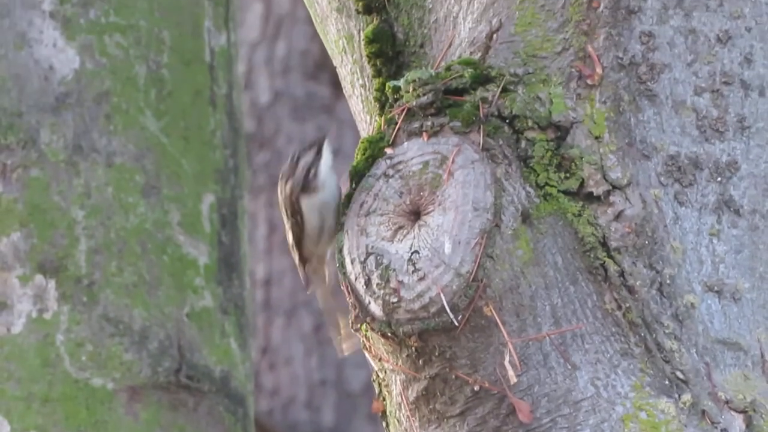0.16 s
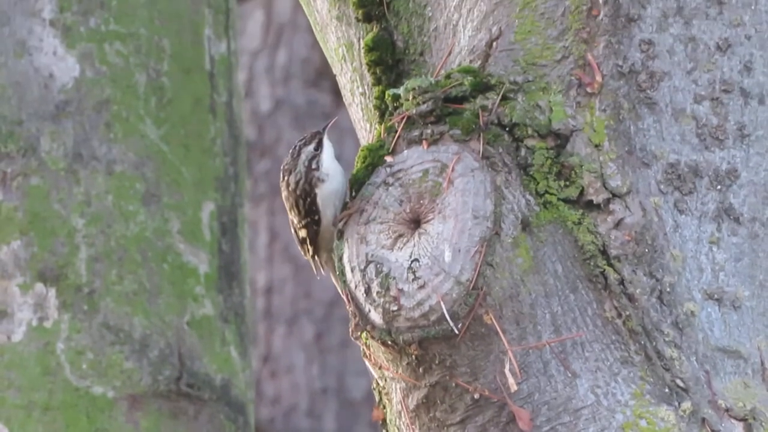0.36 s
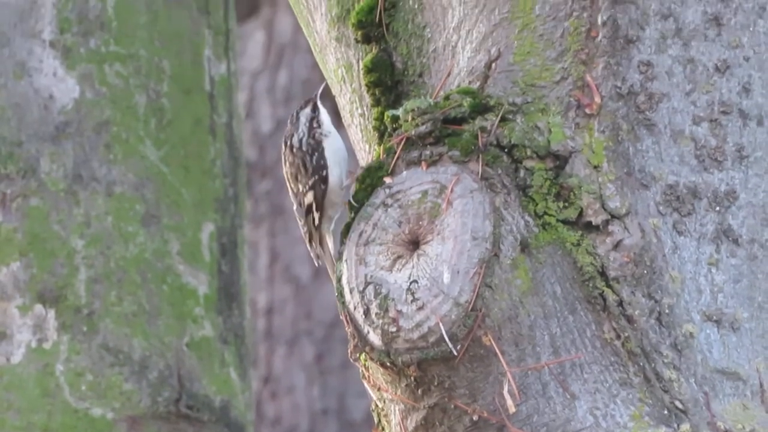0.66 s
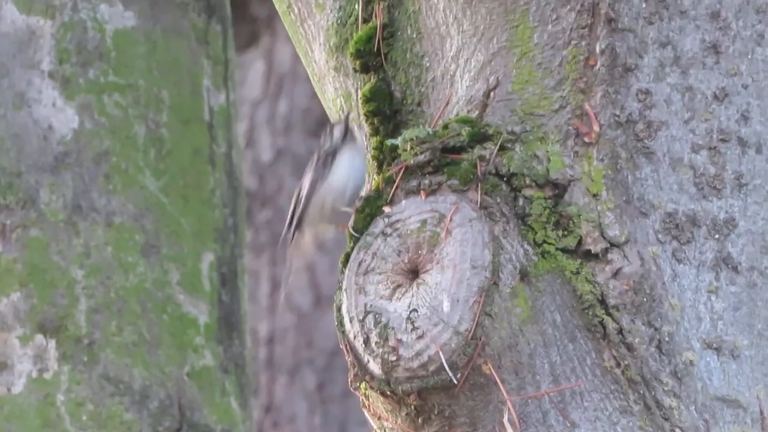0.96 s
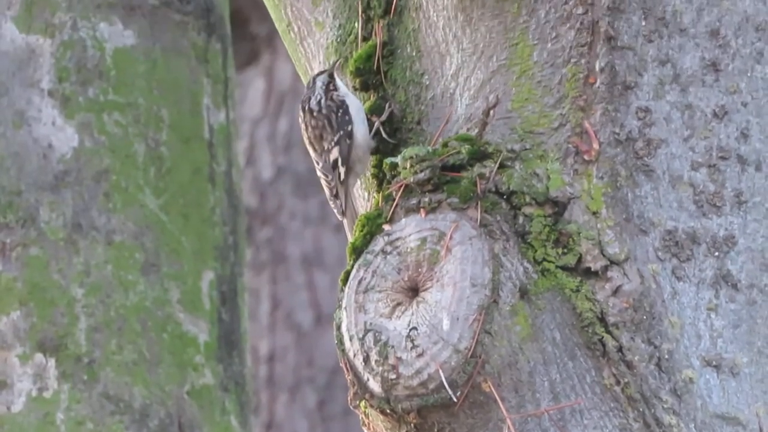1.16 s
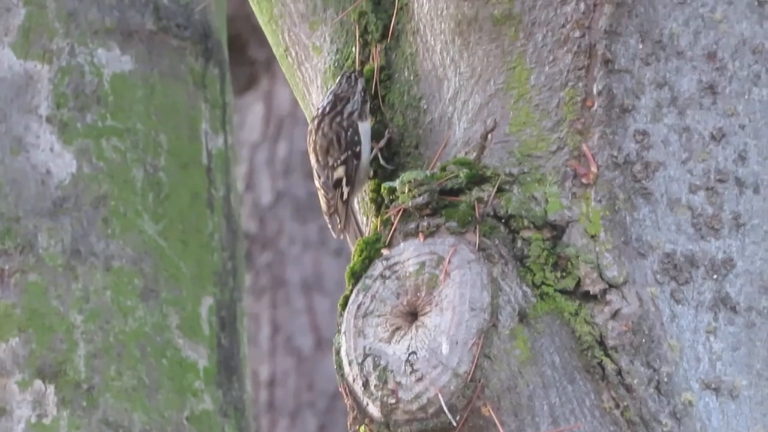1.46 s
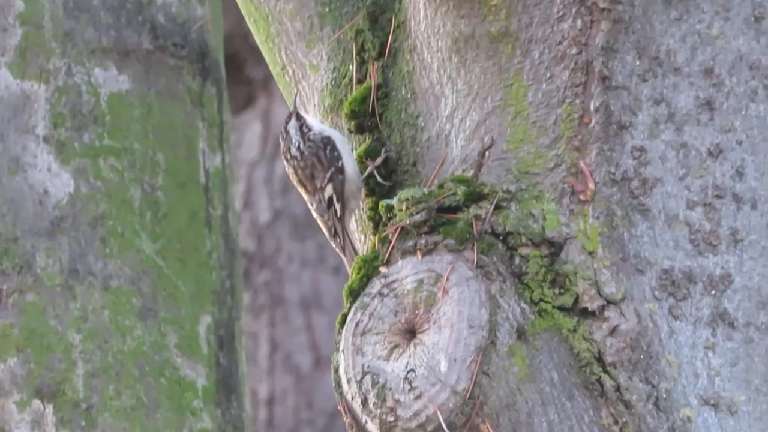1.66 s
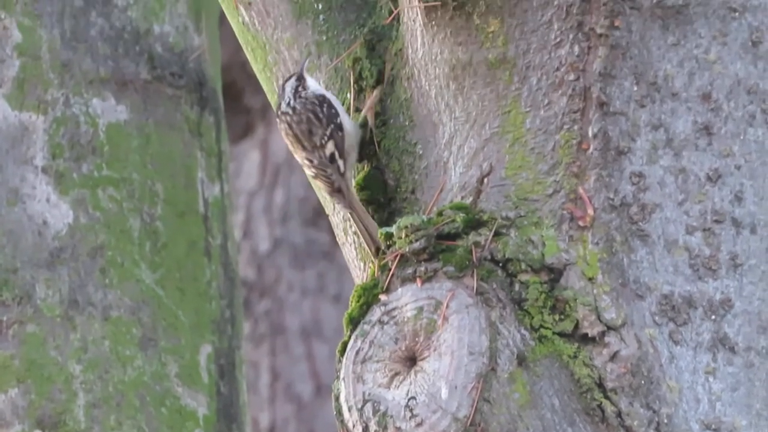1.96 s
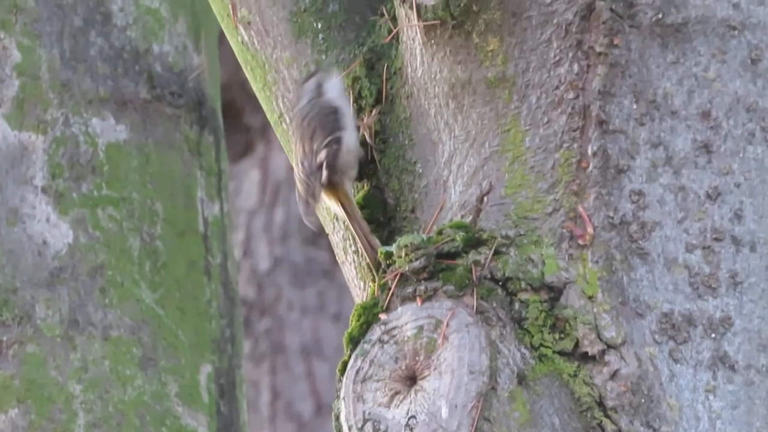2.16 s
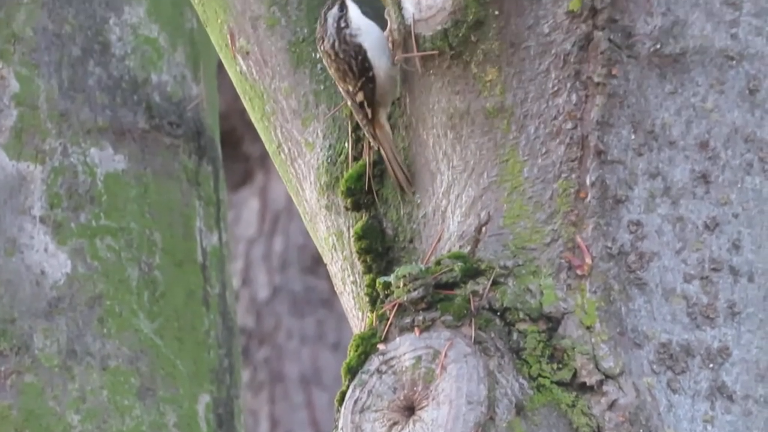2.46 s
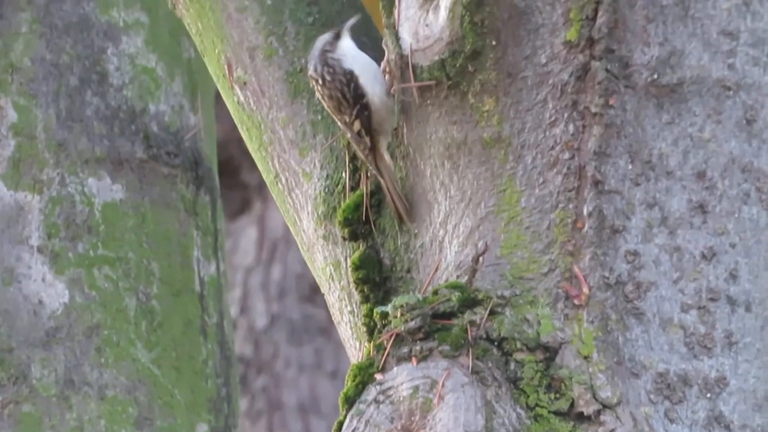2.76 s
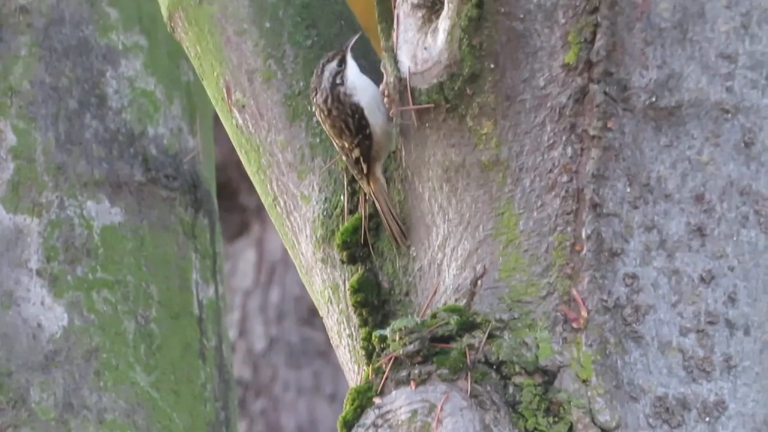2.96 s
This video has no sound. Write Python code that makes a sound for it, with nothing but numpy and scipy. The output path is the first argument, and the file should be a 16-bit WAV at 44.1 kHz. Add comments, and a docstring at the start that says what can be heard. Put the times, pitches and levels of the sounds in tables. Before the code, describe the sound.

A small bird calls among trees over a steady rush and low engine drone of distant traffic. Its claws tick faintly on bark around 0.7, 1.5 and 1.8 seconds. At 2 seconds it gives one short, high chip, then three thin, very high, slightly falling whistles at about 2.3, 2.6 and 2.9 seconds. The notes are soft but clear, each with a short fluttering echo.

```python
"""Among trees, with traffic far off. A steady tyre rush and an engine's drone form the bed.
In front, a small bird climbs a trunk, its claws ticking faintly on the bark, then gives
one short chip and three thin, falling whistles near 8 kHz.
Nearby trunks scatter each note into a short fluttering tail."""
import sys
import numpy as np
from scipy import signal
from scipy.fft import rfft, irfft
from scipy.io import wavfile
from scipy.ndimage import uniform_filter1d

SR = 44100
rng = np.random.default_rng(int(sys.argv[2]) if len(sys.argv) > 2 else 0)


def digitize_waveform(pressure):
    """Quantize a signal to 16-bit integers and store it at the path in sys.argv[1].

    Rows of a 2-D input are taken as channels; values are limited to [-1, 1].
    """
    field = np.atleast_2d(pressure).T
    bounded = np.clip(field, -1, 1)
    quanta = np.round(bounded * 32767).astype(np.int16)
    wavfile.write(sys.argv[1], SR, quanta)


N = 137592

# Tone colour of the traffic bed: frequency_hz, relative_density_db
TRAFFIC_SPECTRUM = [(12, -30), (24, -14), (40, -0.5), (85, 0), (110, -3), (170, -4.5), (260, -6),
                    (400, -10.5), (580, -14.5), (800, -12), (1050, -13.5), (1300, -19), (1650, -19.5),
                    (2100, -24), (2550, -25), (3200, -33), (4200, -38.5), (5300, -42.5), (6200, -48),
                    (9000, -55), (12000, -61), (15000, -68.5)]
# Stereo width of the bed: frequency_hz, side_minus_mid_db
TRAFFIC_WIDTH = [(80, -70), (170, -51), (350, -20.5), (700, -23.5), (1400, -13.5), (2800, -10), (5000, -4),
                 (14000, -0.5)]
# Stereo lean of the bed: frequency_hz, left_minus_right_db
TRAFFIC_LEAN = [(180, 0), (700, .8), (1400, 1.5), (2800, .8), (5000, -.4), (12000, 0)]
# Fader ride on the tyre band: time_s, gain_db
TYRE_RIDE = [(0, 0), (1.3, -0.7), (1.9, 1), (3.12, 0.6)]
# Faint whines in the traffic: pitch_hz, rms_db, loudest_at_s, swell_width_s
TRAFFIC_WHINES = [(469, -39.5, 1.85, 0.2), (468, -43.5, 2.68, .1), (526.5, -48.5, 1.7, 2.2),
                  (1131, -51, 2.3, 1.5)]
# Engine partials, the half steps from uneven cylinders: shaft_multiple, rms_db
ENGINE_ORDERS = [(2, -38.5), (3, -34.5), (3.5, -36.5), (4, -25), (4.5, -42.5), (5.5, -44), (6, -43.5),
                 (7.5, -46.5), (8, -42)]
# Slaps off the nearest trunks: delay_s, gain_db
TRUNK_ECHOES = [(.0075, -6), (.016, -13), (.034, -17), (.043, -21), (.068, -19)]
# Claws catching on bark: start_s, onset_level_db
CLAW_TICKS = [(.656, -49.5), (.753, -53), (1.451, -51), (1.838, -52)]
# The chip and three whistles:
# start_s, length_s, rise_s, crest_hz, fall_s, held_hz, last_hz, level_db, swell_db
BIRD_NOTES = [(2.009, .019, 0.0057, 8580, .022, 7900, 7840, -43.5, 2),
              (2.300, .138, .005, 9070, .053, 7930, 7640, -46.5, -4),
              (2.616, .186, .009, 8690, .039, 7715, 7920, -44, 6),
              (2.887, 0.114, 0.007, 8730, .038, 7870, 7830, -47, 0)]


def undb(db):
    """Decibels to gain."""
    return 10 ** (np.asarray(db) / 20)


def curve(points, hz):
    """Read (Hz, value) points on a log-frequency axis."""
    p = np.array(points, float)
    return np.interp(np.log(np.maximum(hz, 1)), np.log(p[:, 0]), p[:, 1])


def wander(rate_hz):
    """Smooth random modulation with a spread near 1."""
    hold = max(int(SR / rate_hz), 1)
    steps = np.repeat(rng.standard_normal(N // hold + 2), hold)
    return np.sqrt(2) * uniform_filter1d(uniform_filter1d(steps, hold), hold)[:N]


def running_phase(hz):
    """Phase of an oscillator with a moving pitch."""
    return 2 * np.pi * np.cumsum(hz) / SR


def octaves_from(hz, centre_hz):
    """Distance in octaves from a centre frequency."""
    return np.log2(np.maximum(hz, 1) / centre_hz)


def traffic(hz, bands=10, rms_db=-27.5, swell_db=.23, flicker_db=.75):
    """Distant tyre rush and rumble in gently wavering octave bands, wider toward the treble."""
    mid, side = rfft(rng.standard_normal((2, N))) * undb(curve(TRAFFIC_SPECTRUM, hz))
    left_right = np.array([[1], [-1]])
    stereo = mid + left_right * side * undb(curve(TRAFFIC_WIDTH, hz))
    stereo *= undb(left_right * curve(TRAFFIC_LEAN, hz) / 2)
    octave = np.clip(octaves_from(hz, 20), 0, bands - 1)
    shared_swell = swell_db * wander(.76)
    rush = np.zeros((2, N))
    for k in range(bands):
        band = irfft(stereo * np.maximum(1 - abs(octave - k), 0), N)
        rush += band * undb(shared_swell + flicker_db * wander(9.9))
    return rush * undb(rms_db) / np.std(rush)


def tyre_swell(rush, t, hz, centre_hz=1000):
    """The tyre band of the traffic comes up a little in the second half."""
    band = irfft(rfft(rush) * np.exp(-2 * octaves_from(hz, centre_hz) ** 2), N)
    gain = undb(np.interp(t, *np.array(TYRE_RIDE).T))
    return rush + band * (gain - 1)


def whines(t, waver_db=1.3, drift=.0025):
    """Faint unsteady tones that rise out of the traffic and sink back."""
    out = np.zeros(N)
    for pitch_hz, db, loudest_at, width in TRAFFIC_WHINES:
        swell = np.exp(-((t - loudest_at) / width) ** 2 / 2)
        gain = undb(db + waver_db * wander(9.16)) * swell
        out += gain * np.sin(running_phase(pitch_hz * (1 + drift * wander(24.86))))
    return np.sqrt(2) * out


def engine(shaft_hz=20.3, drift=.004, waver_db=.33):
    """A far engine drones at steady speed; only its lowest orders carry."""
    shaft_phase = running_phase(shaft_hz * (1 + drift * wander(2.93)))
    drone = np.zeros(N)
    for order, db in ENGINE_ORDERS:
        gain = undb(db + waver_db * wander(6.1))
        drone += gain * np.sin(order * shaft_phase + 2 * np.pi * rng.random())
    return np.sqrt(2) * drone


def tree_echoes(source, t, tail_db=-4.5, t60_s=.23, width=1.7):
    """A few trunks slap back distinct echoes; branches add a short, wide, diffuse tail."""
    mid, side = rng.standard_normal((2, N)) * undb(-60 * t / t60_s)
    fade_in = np.clip(t / .0051, 0, 1)
    tail = (mid + width * side * np.array([[1], [-1]])) * fade_in
    response = tail * undb(tail_db) / np.sqrt(np.sum(tail ** 2) / 2)
    for delay, db in TRUNK_ECHOES:
        response[:, int(delay * SR * (1 + .02 * rng.standard_normal()))] += undb(db)
    return source + signal.fftconvolve(source[None], response, axes=1)[:, :N]


def claws(t, hz, centre_hz=5200, width_octaves=.17, t60_s=.03):
    """Tiny dry ticks of bright noise as the bird grips the bark."""
    colour = np.exp(-(octaves_from(hz, centre_hz) / width_octaves) ** 2 / 2)
    crackle = irfft(rfft(rng.standard_normal(N)) * colour, N)
    envelope = sum((t >= start) * undb(db - 60 * abs(t - start) / t60_s) for start, db in CLAW_TICKS)
    return crackle / np.std(crackle) * envelope


def bird(t, attack_s=.0086, release_s=.007, rise_hz_per_s=25000, octave_db=-31):
    """Nearly pure whistles: each flicks up to a crest, drops fast, levels out and bends at its end."""
    out = np.zeros(N)
    waver_hz, flutter_db = 19.3 * wander(250), .8 * wander(250)
    for start, length, rise_s, crest_hz, fall_s, held_hz, last_hz, db, swell_db in BIRD_NOTES:
        age = t - start
        progress = np.clip(age / length, 0, 1)
        flick = rise_hz_per_s * np.clip(age - rise_s, -rise_s, 0)
        drop = (crest_hz - held_hz) * np.clip(1 - (age - rise_s) / fall_s, 0, 1) ** 1.4
        end_bend = (last_hz - held_hz) * progress ** 4
        phase = running_phase(held_hz + flick + drop + end_bend + waver_hz)
        whistle = np.sin(phase) + undb(octave_db) * np.sin(2 * phase)
        envelope = np.clip(age / attack_s, 0, 1) * np.clip((length - age) / release_s, 0, 1)
        out += whistle * envelope * undb(db + swell_db * (progress - .5) + flutter_db)
    return out


def scene():
    """The bird among the trees, over a bed of far traffic and engine."""
    t = np.arange(N) / SR
    hz = np.arange(N // 2 + 1) * SR / N
    bed = tyre_swell(traffic(hz), t, hz) + engine() + whines(t)
    return bed + tree_echoes(bird(t) + claws(t, hz), t)


def record(dry):
    """A steep low-pass takes the very top off the mix."""
    top_hz = 15750
    return signal.sosfilt(signal.ellip(10, .1, 80, top_hz, fs=SR, output="sos"), dry)


dry = scene()
out = record(dry)
digitize_waveform(out)
```